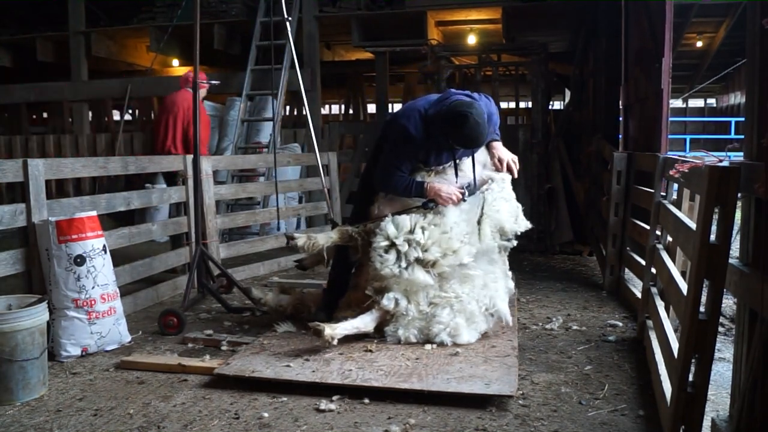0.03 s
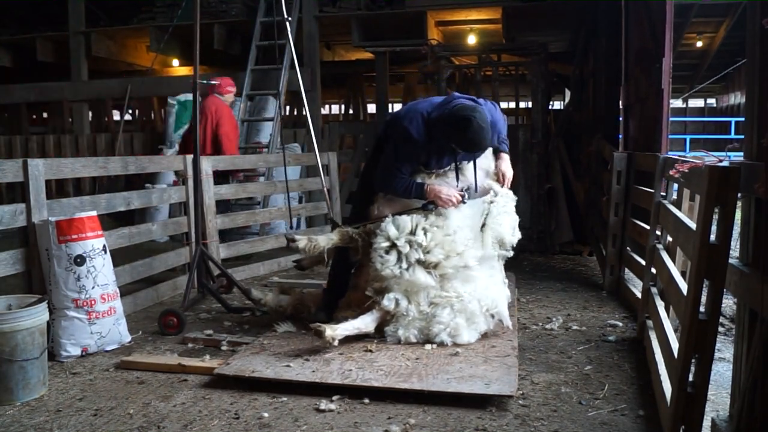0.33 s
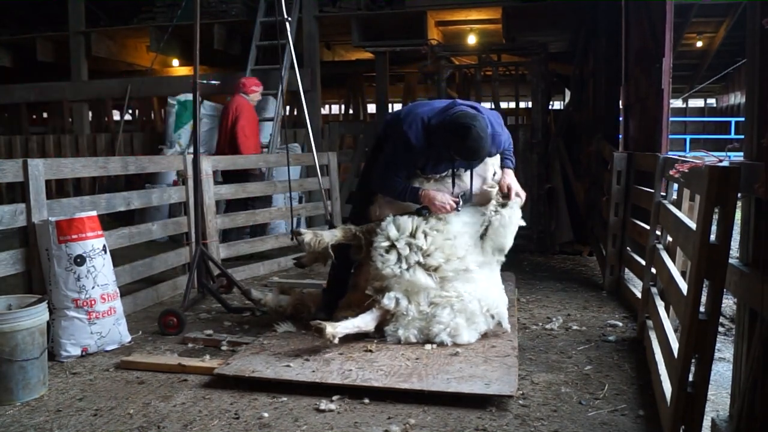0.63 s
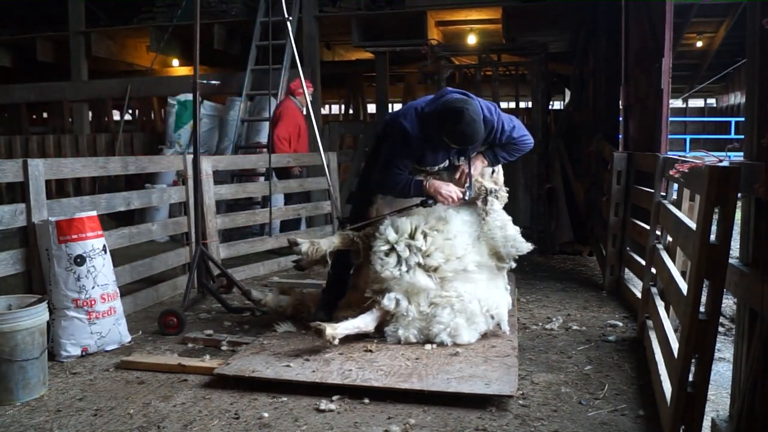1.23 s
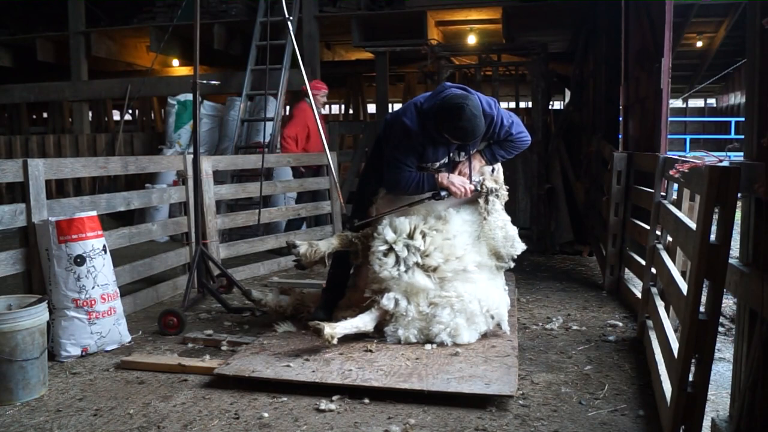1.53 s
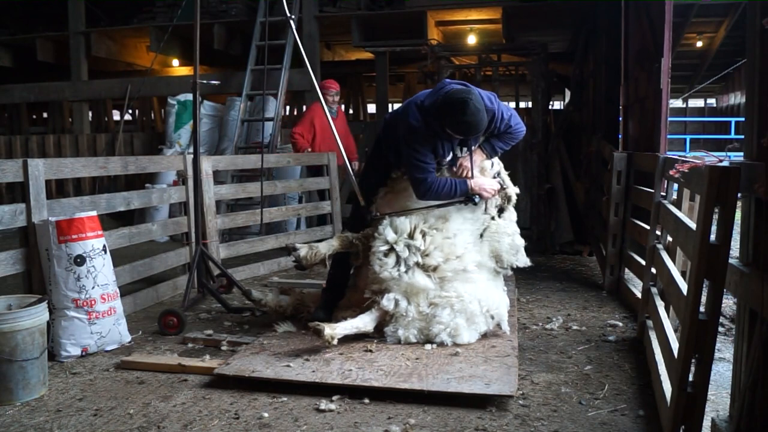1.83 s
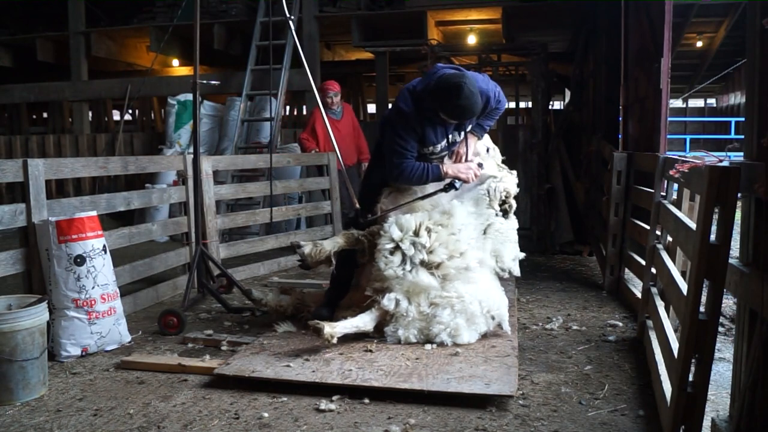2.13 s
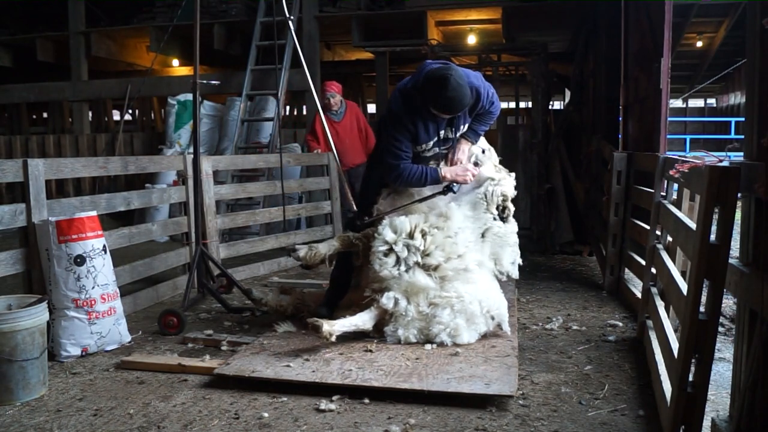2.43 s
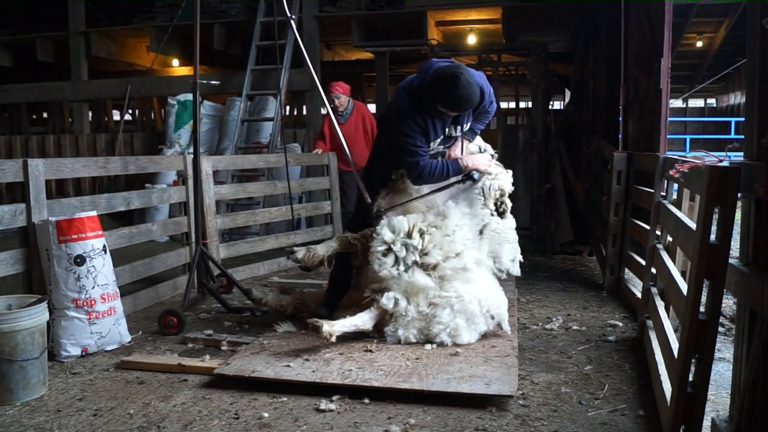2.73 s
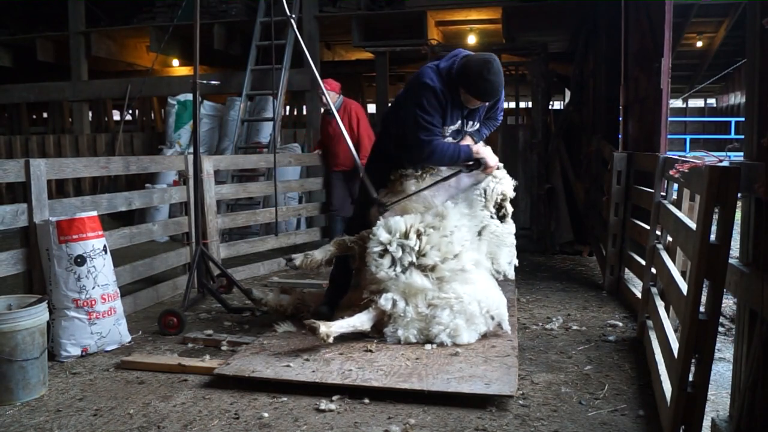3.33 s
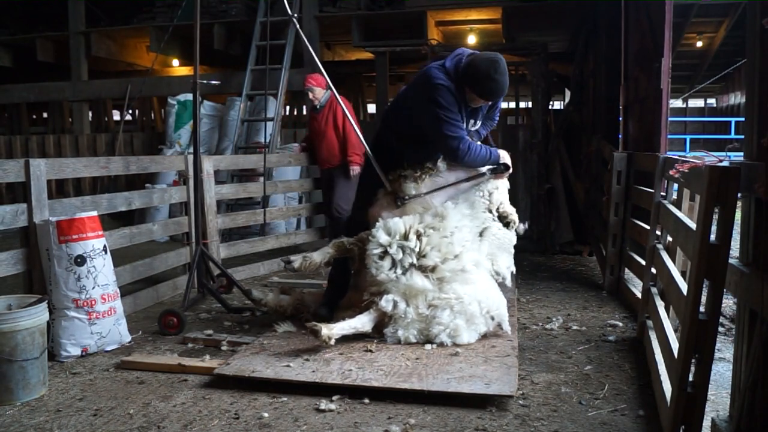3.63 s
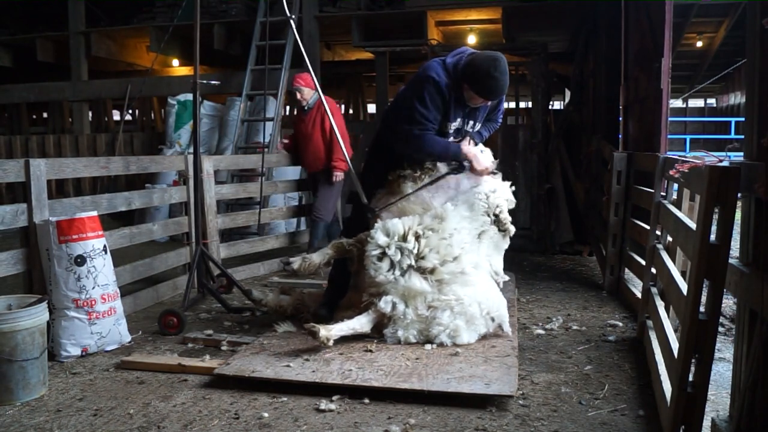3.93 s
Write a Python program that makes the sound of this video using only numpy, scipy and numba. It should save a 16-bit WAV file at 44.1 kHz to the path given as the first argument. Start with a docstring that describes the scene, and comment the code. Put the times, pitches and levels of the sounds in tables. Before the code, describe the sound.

Sheep shears run steadily in a wooden barn, heard from a few metres off: a fast metallic rattle and hiss with a hum beneath. One soft thump comes early, while thin blade squeaks and whistles fade, then briefly return.

```python
"""Shearing handpiece in a barn

A shaft-driven handpiece runs without a pause, a few metres away in a wooden barn. The drive hums, the cutting
rumbles low, the cutter knocks four times per crank turn, steel rasps on steel, and the blades whistle and
squeak very high. One soft thump on the boards near the start, faint shuffles later. A limiter ducks under the
squeaks."""
import sys
import numpy as np
from scipy import signal
from scipy.fft import rfft, irfft
from scipy.io import wavfile
from scipy.ndimage import uniform_filter1d
from numba import njit

SR = 44100
rng = np.random.default_rng(int(sys.argv[2]) if len(sys.argv) > 2 else 0)


def pcm_store(signal):
    """Save signal as 16-bit PCM."""
    levels = np.round(np.clip(np.atleast_2d(signal), -1, 1) * 32767)
    wavfile.write(sys.argv[1], SR, levels.astype(np.int16).T)


N = 176400
TIME_S = np.arange(N) / SR


def undb(db):
    """Decibels to gain."""
    return 10 ** (np.asarray(db) / 20)


def unit(x):
    """Scale to rms 1."""
    return x / np.sqrt(np.mean(x ** 2))


def bell(x, centre, half_width):
    """Gaussian, peak 1, down to 1/e at half_width."""
    return np.exp(-((x - centre) / half_width) ** 2)


def curve(rows):
    """Interpolate (time, value) rows per sample."""
    return np.interp(TIME_S, *np.transpose(rows))


def over_hz(rows):
    """Interpolate (frequency, value) rows per FFT bin, log axis."""
    hz, values = np.transpose(rows)
    return np.interp(np.log(np.arange(N // 2 + 1) * SR / N + 1), np.log(hz), values)


def colour(x, rows):
    """Filter by (frequency, gain) rows; output rms 1."""
    return unit(irfft(rfft(x) * undb(over_hz(rows)), N))


def noise():
    """White noise on two independent paths."""
    return rng.standard_normal((2, N))


def walk(rate_hz):
    """Smooth random drift, rms 1."""
    hold = int(SR / rate_hz)
    steps = rng.standard_normal(400)[np.arange(N) // hold]
    return unit(uniform_filter1d(uniform_filter1d(steps, hold), hold))


# (time [s], speed [turns/s])
CRANK_SPEED = [(0, 58.45), (1.3, 58.48), (1.55, 58.35), (2.35, 58.32), (2.75, 58.22), (2.9, 57.9),
               (3.1, 58.38), (3.3, 57.98), (3.49, 57.62), (3.66, 58.15), (3.83, 57.85), (4, 58.15)]


def crank():
    """Crank position in turns; the speed sags slightly."""
    return np.cumsum(curve(CRANK_SPEED)) / SR


# (crank harmonic [1], level [dB])
HUM_PARTIALS = [(2, -70), (3, -59.5), (5, -57), (6, -58), (8, -58), (9, -51), (10, -53), (11, -48.5),
                (12, -47.5), (13, -52), (14, -49), (15, -54), (16, -52), (19, -44), (21, -40.5), (24, -47),
                (25, -47), (27, -45), (29, -49), (30, -45), (31, -44.5), (33, -43), (37, -43), (38, -43),
                (40, -43), (51, -43.5)]
# (crank harmonic [1], centre [s], half width [s], gain [dB])
HUM_SWELLS = [(3, .68, .1, -13), (3, 1.85, .17, -6), (3, 2.23, .08, 3.5), (3, 3.2, .5, 3),
              (3, 2.5, .14, -16), (9, .26, .1, 5), (9, .65, .25, -9), (9, 1.47, .1, 7), (9, 2.18, .1, -7),
              (9, 2.78, .22, 5), (11, .78, .22, -12), (11, 2.12, .12, 6), (11, 3, .17, 9),
              (12, .78, .15, 5), (12, 1.87, .17, 7), (12, 2.55, .25, -6), (12, 3.07, .11, 7),
              (13, 1.85, .2, 5), (13, 2.37, .15, 9), (13, 2.92, .12, 9), (14, .7, .3, -6),
              (14, 2.57, .15, 10.5), (14, 3.16, .17, 10), (14, 3.88, .07, 9), (19, 1.83, .07, 6),
              (19, 2.88, .07, 6), (19, 3.55, .35, 4), (21, .23, .08, 5), (21, .62, .22, -10),
              (21, 2.13, .1, 5), (21, 3.45, .45, 4.5), (24, .08, .1, 8), (24, 1.32, .17, 8),
              (24, 2.6, .12, 7), (29, 2.83, .17, 9), (33, .15, .3, 6), (37, 3.05, .12, 7),
              (38, .38, .13, 8), (38, .88, .2, 8), (40, 1.35, .15, 7), (40, 2.2, .18, 6), (51, 1, .8, 5.5)]


def hum(turns, wander_db=1.2, flutter_db=2.8, wander_rad=.45, echo_gain=.5):
    """Drive harmonics; they swell, fade and waver as the handpiece is turned."""
    out = np.zeros((2, N))
    for harmonic, db in HUM_PARTIALS:
        swell_db = sum(rise_db * bell(TIME_S, centre_s, half_s)
                       for k, centre_s, half_s, rise_db in HUM_SWELLS if k == harmonic)
        peak = np.sqrt(2) * undb(db + swell_db + wander_db * walk(6.08) + flutter_db * walk(55))
        phase = 2 * np.pi * (harmonic * turns + rng.random()) + wander_rad * walk(9)
        echo_phase = phase + 2 * np.pi * rng.random() + walk(2.91)
        out[0] += peak * np.sin(phase)
        out[1] += peak * echo_gain * np.sin(echo_phase)
    return out


# (time [s], relative level [dB])
RUMBLE_ENVELOPE = [(0, -54), (.42, -51), (.56, -56), (.68, -63), (.76, -50), (.95, -50), (1.28, -58),
                   (1.6, -45.5), (1.8, -53), (2, -49), (2.27, -48), (2.46, -58), (2.67, -47), (2.82, -46.5),
                   (3.13, -54), (3.4, -47.5), (3.6, -54), (3.87, -48.5), (4, -52)]
# (frequency [Hz], relative gain [dB])
RUMBLE_SPECTRUM = [(25, -40), (60, -27), (110, -14.5), (170, -7.5), (270, 4.5), (330, 0), (400, -14),
                   (520, -2.5), (800, 5.5), (1500, -43)]


def rumble(gain_db=4, wander_db=1):
    """Low rumble of the cutting in the barn, rising and falling with the load."""
    band = colour(noise(), RUMBLE_SPECTRUM)
    return band * undb(curve(RUMBLE_ENVELOPE) + gain_db + wander_db * walk(8.2))


# (crank position [turns], relative level [dB])
CUTTER_KNOCKS = [(.04, -9.5), (.3, -0.5), (.55, -8), (.84, -7.5)]
# (time [s], relative level [dB])
RATTLE_ENVELOPE = [(0, -23), (.16, -24), (.43, -23.8), (.57, -25.8), (.71, -24.5), (.86, -22.8),
                   (1.1, -24.3), (1.24, -22.3), (1.41, -22.7), (1.61, -24.8), (1.9, -24), (2.11, -22.2),
                   (2.46, -24.8), (2.76, -25), (3.01, -23.2), (3.21, -24.3), (3.56, -24.2), (4, -24)]
# (frequency [Hz], relative gain [dB])
RATTLE_SPECTRUM = [(60, -94), (250, -26), (450, -38), (650, -9.5), (1000, -11.5), (1400, -8.5), (1900, -4),
                   (2300, -1.5), (2650, -0.5), (2980, -2), (3250, -3.5), (5000, -3), (7500, -6.5),
                   (11000, -10), (16000, -30)]


def rattle(turns, jitter_s=24e-6, scatter_db=1.3, ring_s=.0023, barn_t60_s=.17, barn_db=13.5, poses=9):
    """Cutter knocks ring the steel and the barn; the response crossfades between handpiece poses."""
    steel = unit(np.exp(-TIME_S / ring_s))
    barn = unit(np.exp(-TIME_S * np.log(1000) / barn_t60_s))
    decay = (steel + undb(barn_db) * barn)[:SR // 3]
    cycles, taps, spans = np.arange(240), np.arange(-6, 7), poses - 1
    out = np.zeros((2, 2 * N))
    for position, db in CUTTER_KNOCKS:
        jitter, scatter = rng.standard_normal((len(cycles), 2)).T
        onsets = (np.interp(cycles + position, turns, TIME_S, right=-1) + jitter_s * jitter) * SR
        index = onsets.astype(int)[:, None] + taps
        clicks = np.sinc(index - onsets[:, None]) * undb(db + scatter_db * scatter)[:, None]
        clicks *= index >= 0  # mute knocks past the end
        for pose in range(poses):
            fade = np.cos(np.pi / 2 * np.clip(onsets / N * spans - pose, -1, 1))[:, None]
            train = np.bincount(np.clip(index, 0, N - 1).ravel(), (clicks * fade).ravel(), N)
            start, end = max(0, (pose - 1) * N // spans), min(N, (pose + 1) * N // spans)
            response = decay * rng.standard_normal((2, len(decay)))
            rung = signal.fftconvolve(train[None, start:end], response, axes=1)
            out[:, start:start + rung.shape[1]] += rung
    return colour(out[:, :N], RATTLE_SPECTRUM) * undb(curve(RATTLE_ENVELOPE) + 1.5)


# (time [s], level [dB])
RASP_ENVELOPE = [(0, -19), (.13, -18), (.21, -19), (.45, -19), (.56, -20), (.71, -20), (.81, -19.2),
                 (1.21, -19.7), (1.31, -20), (1.61, -20.2), (2.1, -19.2), (2.5, -19.3), (2.81, -19.3),
                 (2.94, -17.7), (3.16, -18.8), (3.43, -17.8), (3.53, -18.9), (4, -19)]
# (frequency [Hz], relative gain [dB])
RASP_SPECTRUM = [(50, -70), (200, -45), (500, -17), (1000, -10.5), (2200, -0.5), (3400, -2), (4400, 0),
                 (5200, 1), (5800, -1), (6200, 0.5), (6600, -1), (7100, 1.5), (8000, -2), (9700, -3.5),
                 (11000, -8.5), (12500, -5.5), (14500, -12), (15700, -19), (16500, -30)]
# (time [s], level [dB])
COMB_ENVELOPE = [(0, -27), (.4, -28), (.9, -37), (1.4, -47), (1.8, -80), (4, -52)]


def rasp(turns, depth=.21, peak_turn=.028, scatter_db=.55, flicker_db=.3, comb_hz=7620, width_hz=530):
    """The cutter slides over the comb: hiss that swells once a turn and rings the comb."""
    swell = unit(1 + depth * np.cos(2 * np.pi * (turns - peak_turn)))
    stroke_db = scatter_db * rng.standard_normal(1000)[(2 * turns).astype(int)]
    strength = undb(stroke_db + flicker_db * walk(18))
    hiss = colour(noise() * swell * strength, RASP_SPECTRUM)
    resonator = signal.iirpeak(comb_hz, comb_hz / width_hz, SR)
    comb = unit(signal.lfilter(*resonator, noise() * swell ** 2))
    return hiss * undb(curve(RASP_ENVELOPE)) + comb * undb(curve(COMB_ENVELOPE))


# (frequency [Hz], centre [s], half width [s], gain [dB])
STEEL_RINGS = [(1450, .05, .15, 4), (1480, 1.32, .18, 5), (2150, 2.1, .07, 2.5), (2900, 3.53, .04, 7),
               (2320, 2.8, .5, -3), (7550, .5, .6, 3), (2980, 1.3, .25, 3), (4950, 1.22, .04, 6),
               (6150, 3.25, .2, 3)]


def steel_resonances(x, depth_db=2, patch_s=.045, patch_hz=120, half_width_hz=140):
    """Narrow resonances come and go as the handpiece changes angle."""
    hz, t, bins = signal.stft(x, SR, nperseg=1024)
    patches = rng.standard_normal(bins.shape[1:])
    for _ in range(2):
        patches = uniform_filter1d(patches, round(patch_hz / hz[1]), axis=0)
        patches = uniform_filter1d(patches, round(patch_s / t[1]), axis=1)
    rings_db = sum(db * bell(hz[:, None], ring_hz, half_width_hz) * bell(t, centre_s, half_s)
                   for ring_hz, centre_s, half_s, db in STEEL_RINGS)
    gain = undb(rings_db) * unit(undb(depth_db * unit(patches)))
    return signal.istft(bins * gain, SR)[1][:, :N]


# (time [s], relative level [dB])
WHISTLE_ENVELOPE = [(0.0, -36), (0.03, -49), (0.36, -30), (0.46, -38), (0.65, -23.5), (0.68, -27),
                    (0.78, -26), (0.8, -31), (1.11, -30), (1.24, -43), (1.28, -21), (1.45, -57), (2.8, -62),
                    (2.83, -36), (2.97, -51), (3.04, -30), (3.09, -39), (3.17, -28), (3.22, -45),
                    (3.24, -28), (3.26, -30), (3.41, -39), (3.48, -26), (3.7, -40), (3.92, -29), (4.0, -47)]
# (frequency [Hz], relative gain [dB])
WHISTLE_SPECTRUM = [(12300, -77), (12740, -51), (12860, 12), (12980, 12), (13300, 0), (13900, -1),
                    (15500, -40)]


def whistle(gain_db=1.5, flicker_db=2.4):
    """Thin, flickering blade whistle: narrow noise near 13 kHz."""
    band = colour(noise(), WHISTLE_SPECTRUM)
    return band * undb(curve(WHISTLE_ENVELOPE) + gain_db + flicker_db * walk(40))


# (time [s], relative level [dB])
LOUD_SQUEAKS = [(.164, -9), (.284, -11), (.386, -11), (.489, -10), (.522, -12), (.558, -10), (.608, -11),
                (.642, -14), (.659, -9), (.694, -12), (.746, -13), (.797, -11), (.83, -14), (.882, -14),
                (.899, -10), (.914, -13), (.933, -11), (.95, -11), (.984, -13), (1.014, -12), (1.052, -11),
                (1.07, -13), (1.104, -12), (1.121, -11), (1.156, -11), (1.208, -11), (1.258, -9),
                (1.361, -14), (1.412, -13), (1.532, -16), (1.979, -16), (2.47, -17), (3.06, -17),
                (3.18, -17), (3.236, -12), (3.65, -16)]
# (time [s], relative level [dB])
FAINT_SQUEAK_ENVELOPE = [(0, -26), (.35, -22), (.62, -18), (1.17, -18), (1.5, -27), (2.7, -30), (3.2, -26),
                         (4, -28)]


def squeaks(turns, pitch_hz=14300, fall_hz_per_s=340000, peak_s=.0016, half_s=.002, gain_db=-4.5,
            scatter_db=3, tail_s=.012, tail_db=-1):
    """Falling blade chirps, a faint one each turn and some loud ones; the barn smears them."""
    faint_s = np.interp(np.arange(1, int(turns[-1])), turns, TIME_S)
    to_loud_s = np.abs(faint_s[:, None] - np.array(LOUD_SQUEAKS)[:, 0]).min(1)
    faint_s = faint_s[to_loud_s > .009]
    faint_db = curve(FAINT_SQUEAK_ENVELOPE)[(faint_s * SR).astype(int)]
    faint_db += scatter_db * rng.standard_normal(len(faint_s))
    chirps = np.zeros(N)
    for start_s, db in [*zip(faint_s, faint_db), *LOUD_SQUEAKS]:
        onset = int(start_s * SR)
        span = slice(max(0, onset - 400), onset + 600)
        from_peak_s = TIME_S[span] - start_s - peak_s
        hz = pitch_hz + 200 * rng.standard_normal() - fall_hz_per_s * from_peak_s
        envelope = undb(db + gain_db) * bell(from_peak_s, 0, half_s)
        chirps[span] += envelope * np.sin(2 * np.pi * np.cumsum(hz) / SR)
    tail = (noise() * np.exp(-TIME_S / tail_s))[:, :SR // 10]
    tail *= undb(tail_db) / np.linalg.norm(tail[0])
    return chirps + signal.fftconvolve(chirps[None], tail, axes=1)[:, :N]


# (frequency [Hz], relative level [dB], T60 [s])
BOARD_MODES = [(160, -12, .18), (235, -6, 0.13), (284, 3.5, 0.11), (330, 1.5, 0.11)]


def thump(start_s=.109, push_s=.0098, gain_db=-30.5):
    """A soft blow rings the wooden boards."""
    age_s = np.maximum(TIME_S - start_s, 0)
    push = 1 - bell(age_s, 0, push_s)
    modes = sum(undb(db + gain_db) * np.sin(2 * np.pi * hz * age_s) * undb(-60 * age_s / t60_s)
                for hz, db, t60_s in BOARD_MODES)
    return push * modes


# (centre [s], half width [s], level [dB])
FLOOR_SHUFFLES = [(1.193, .025, -66), (1.93, .08, -58), (3.1, .025, -61), (3.67, .05, -60)]
# (frequency [Hz], relative gain [dB])
SHUFFLE_SPECTRUM = [(20, -10), (60, 2), (100, 0), (200, -19)]


def shuffles():
    """Weight shifts on the floor: dull noise bursts."""
    envelope = sum(undb(db) * bell(TIME_S, centre_s, half_s) for centre_s, half_s, db in FLOOR_SHUFFLES)
    return colour(noise(), SHUFFLE_SPECTRUM) * envelope


# (frequency [Hz], left-right coherence [1])
COHERENCE = [(40, .65), (130, .94), (290, .86), (640, .8), (1300, .72), (3100, .52), (7000, .47),
             (15000, .45)]
# (frequency [Hz], left over right [dB])
BALANCE = [(60, 10), (110, -1), (200, 0), (380, -0.5), (700, 0.5), (1290, 3), (2380, 5), (4400, 8.0),
           (8120, 10.5), (15000, 12)]
# (frequency [Hz], phase lag of right [rad])
RIGHT_LAG = [(0, 0), (430, -0.6), (1210, -1.34), (3010, -0.88), (4910, -0.58), (7060, -.95), (10000, -0.19),
             (13800, -1.6)]


def microphones(paths):
    """Mix two paths to partly coherent stereo; the treble leans left."""
    first, second = rfft(paths)
    coherence = over_hz(COHERENCE)
    right_gain = undb(-over_hz(BALANCE))
    shared = right_gain * coherence * np.exp(-1j * over_hz(RIGHT_LAG))
    own = right_gain * np.sqrt(1 - coherence ** 2)
    mid_gain = np.hypot(np.abs(1 + shared), own) / 2
    return irfft(np.array([first, shared * first + own * second]) / mid_gain, N)


def scene():
    """One crank times hum, rattle, rasp and squeaks; the other layers run free."""
    turns = crank()
    drive = hum(turns) + rumble()
    steel = steel_resonances(rattle(turns) + rasp(turns))
    blades = whistle() + squeaks(turns)
    return microphones(drive + steel + blades + thump() + shuffles())


@njit
def follow(x, release):
    """Peak follower: instant attack, exponential release."""
    out, held = np.empty(len(x)), 0.
    for i in range(len(x)):
        held = max(x[i], held * release)
        out[i] = held
    return out


def record(dry, threshold_db=-6, treble_db=10, release_s=.07, slope=.7, ceiling=.85, top_hz=15850):
    """Limiter keyed on the left channel, keenest on high treble; then clipper and low-pass."""
    treble = signal.sosfilt(signal.butter(4, 13000, "high", fs=SR, output="sos"), dry[0])
    power = uniform_filter1d(dry[0] ** 2 + (undb(treble_db) * treble) ** 2, size=128, origin=63)
    level = follow(np.sqrt(np.abs(power)), np.exp(-1 / (release_s * SR)))
    gain = np.maximum(level / undb(threshold_db), 1) ** -slope
    lowpass = signal.ellip(10, .2, 80, top_hz, fs=SR, output="sos")
    return signal.sosfilt(lowpass, np.clip(dry * gain, -ceiling, ceiling))


dry = scene()
out = record(dry)
pcm_store(out)
```